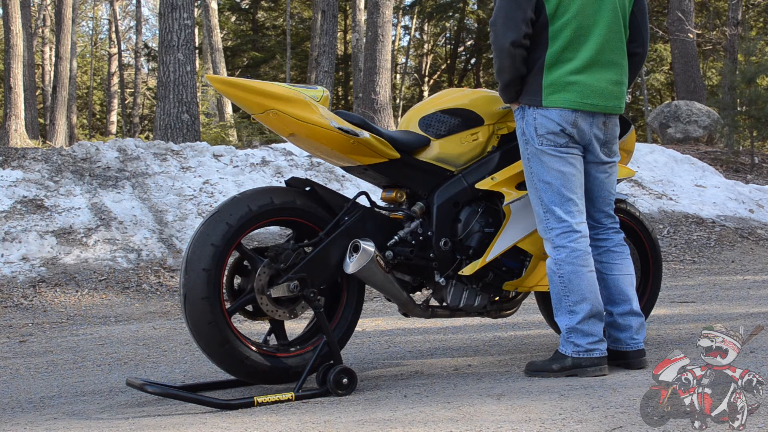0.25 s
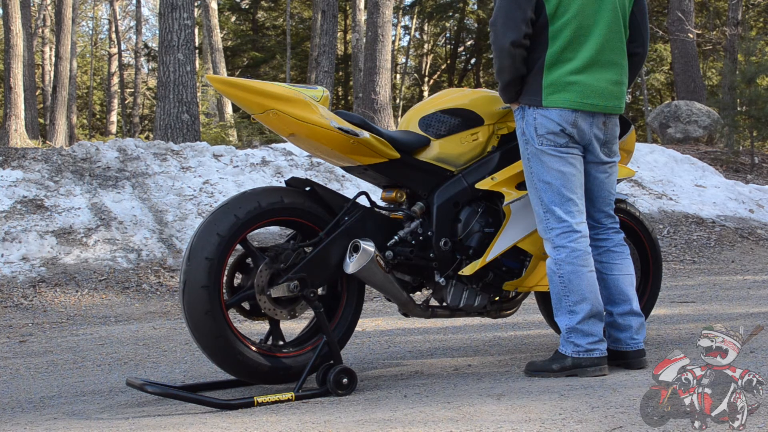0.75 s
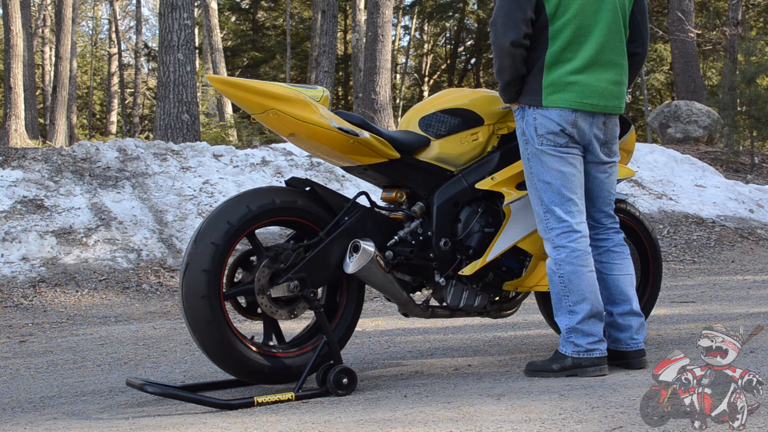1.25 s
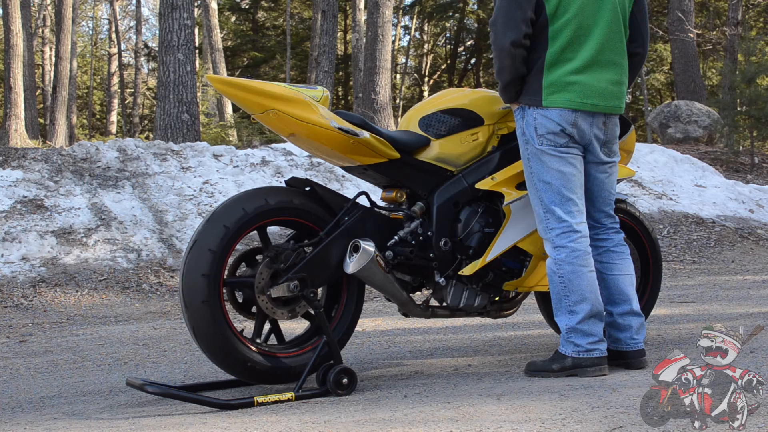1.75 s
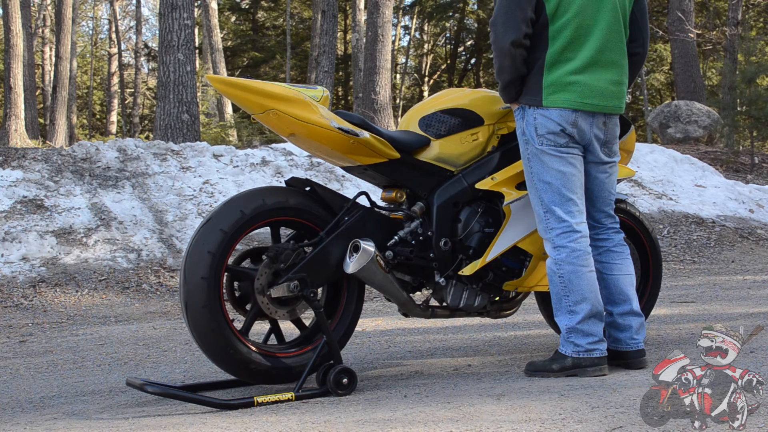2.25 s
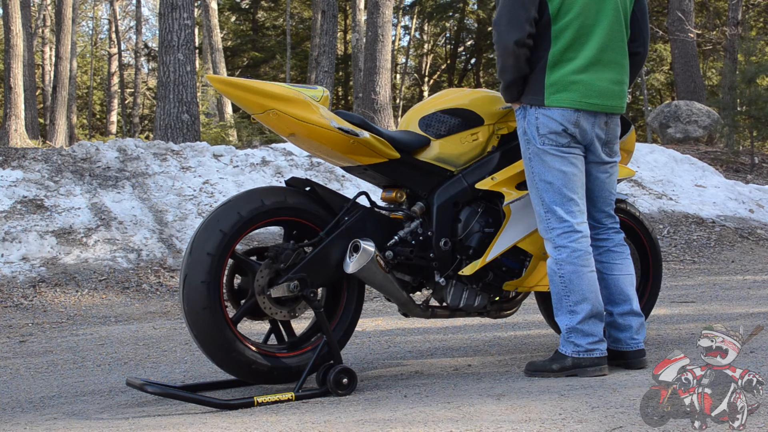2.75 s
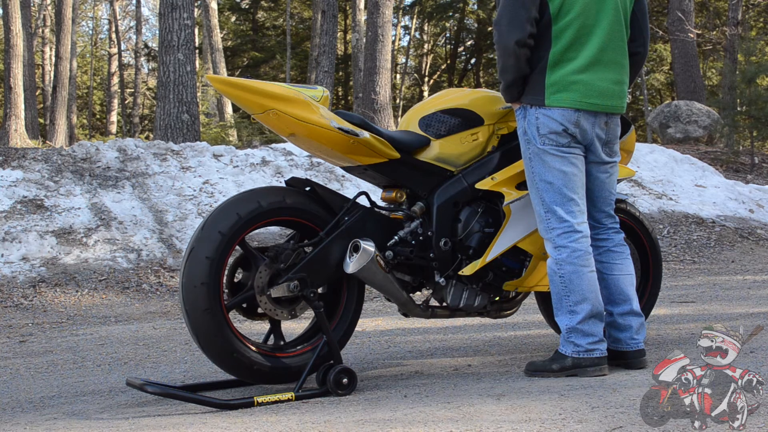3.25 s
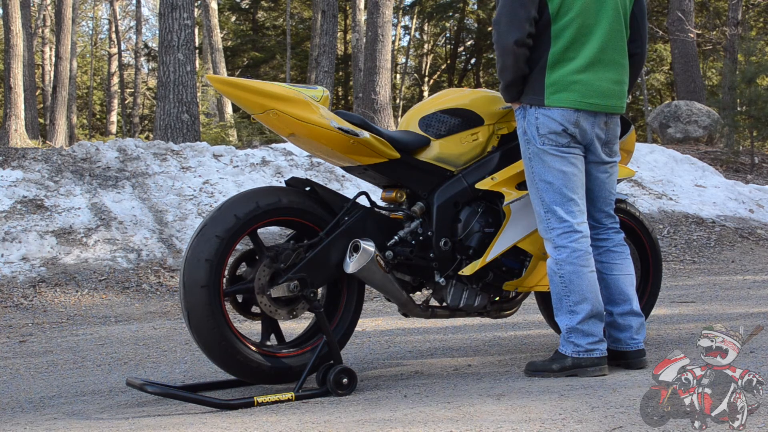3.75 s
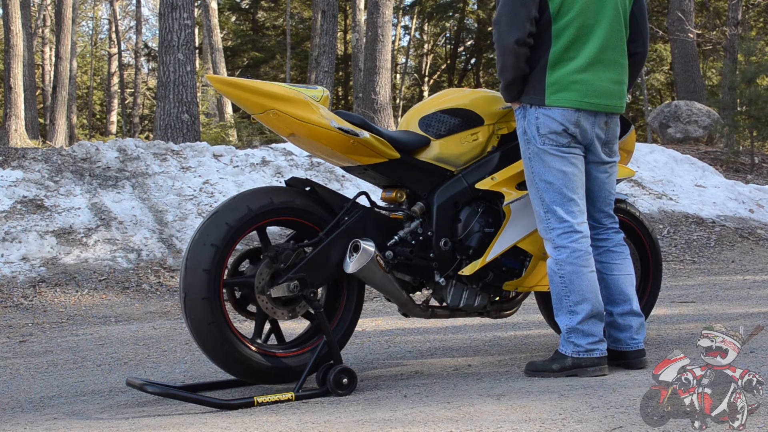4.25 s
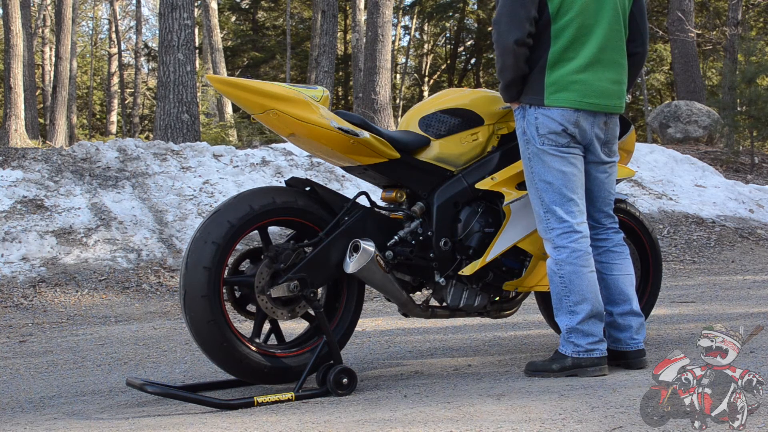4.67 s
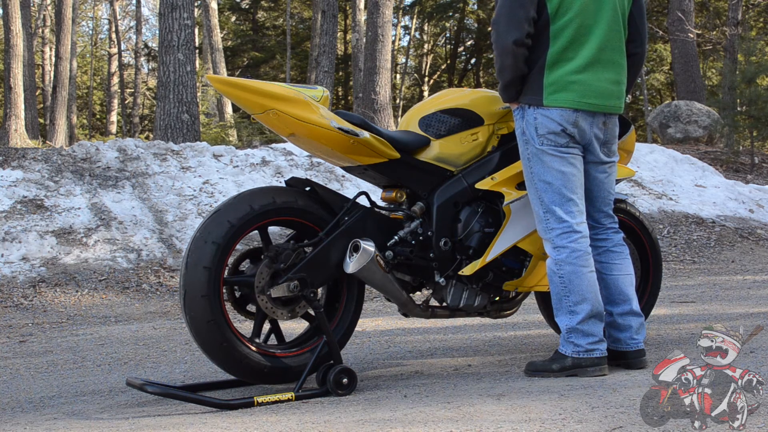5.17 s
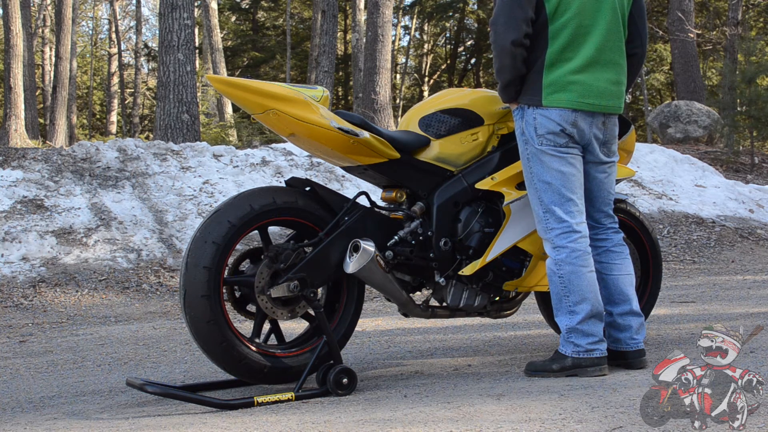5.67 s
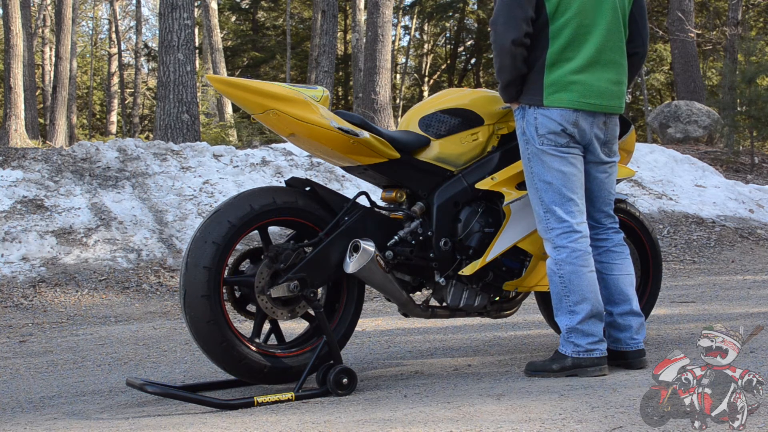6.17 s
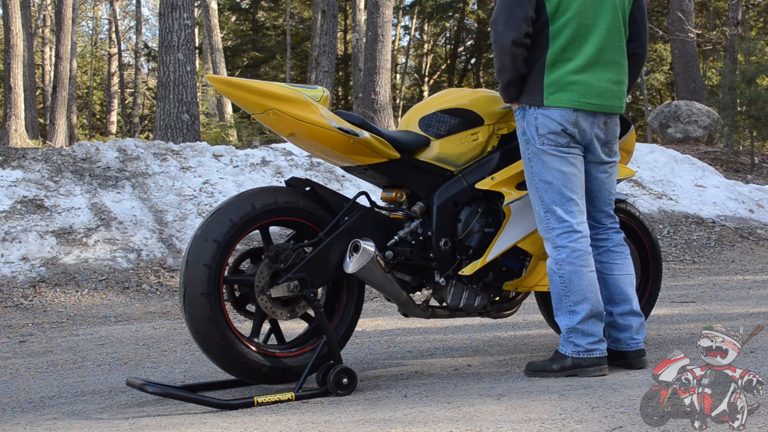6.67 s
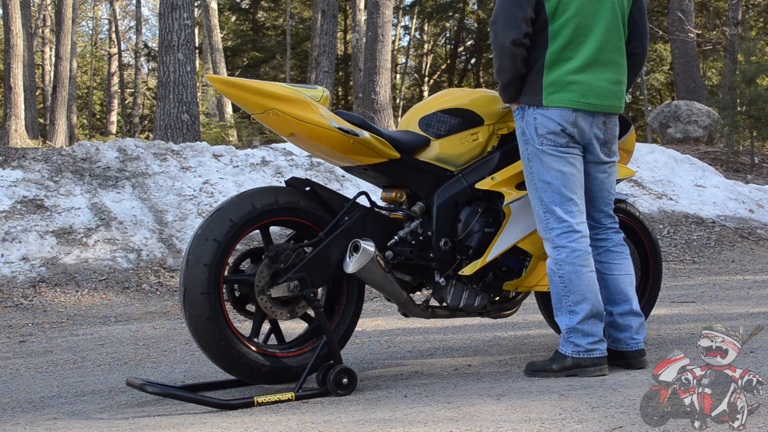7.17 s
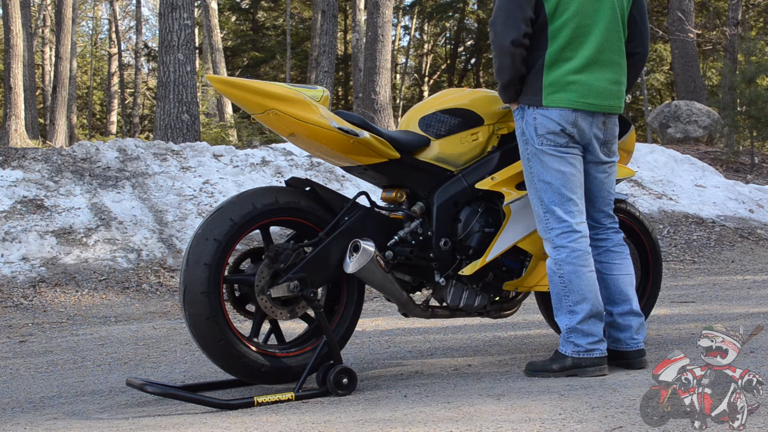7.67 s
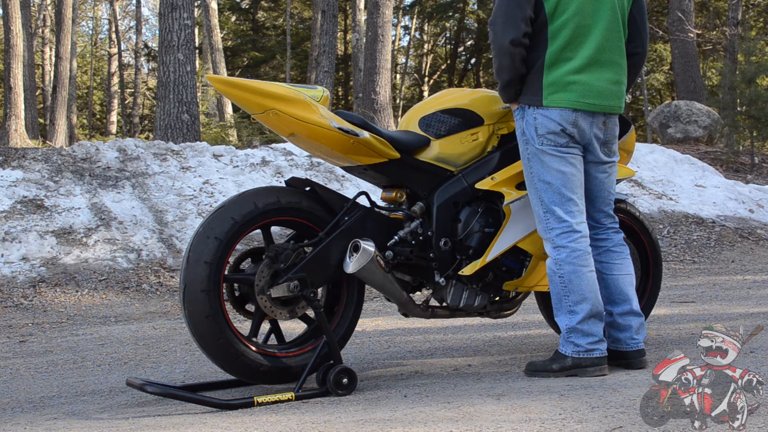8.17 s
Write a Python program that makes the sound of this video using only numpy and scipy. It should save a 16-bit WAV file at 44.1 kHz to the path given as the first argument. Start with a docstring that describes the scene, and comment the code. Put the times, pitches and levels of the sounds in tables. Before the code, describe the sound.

A stationary sport bike, heard close to its exhaust: the note climbs within about a second and a half and holds, hard and buzzing with gas hiss and fine valve ticking. It is released, pops and coasts down into a rough, low burble. Two abrupt throttle stabs follow, booming and fizzing at the peaks, each dropping back. Open air, faint woodland echo.

```python
"""A gravel road by a wood: a four-cylinder sport motorcycle stands there, held at high revs, let down
to near idle, then blipped twice. A counter of firings drives the engine: harmonic pulses boom through
the muffler and ring the tailpipe; noise surging with the firings makes gas hiss, valve clatter and fizz.
Fuel pops in the pipe, echoes scatter in the wood, and the loudest pulses overload the microphone."""
import sys
import numpy as np
from scipy import signal
from scipy.fft import irfft
from scipy.io import wavfile
from scipy.ndimage import uniform_filter1d

SR = 44100
rng = np.random.default_rng(int(sys.argv[2]) if len(sys.argv) > 2 else 0)


def log_audio(samples):
    """Write samples as a 16-bit WAV file to the path given in sys.argv[1]."""
    # one column per channel
    frames = np.atleast_2d(samples).T
    # limit to full scale, then quantise
    limited = np.clip(frames, -1, 1)
    pcm = np.round(limited * 32767).astype(np.int16)
    wavfile.write(sys.argv[1], SR, pcm)


N = 370881
TIME = np.arange(N) / SR
TAPS = 8192  # samples in a filter's spectrum and in one cycle of the pulse waveform
BINS_HZ = np.fft.rfftfreq(TAPS, 1 / SR)

# The held throttle is let go. In order: throttle shuts in seconds, friction in Hz per second,
# burbling starts in seconds.
LET_GO = (3.585, 130.3, 4.04)
# Throttle blips. Each row: engine catches in seconds, throttle shuts in seconds, lowest and top speed in
# firings per second, friction afterwards in Hz per second, burbling starts in seconds.
BLIPS = [(5.19, 6.459, 63, 276.1, 142.9, 6.71), (7.374, 7.746, 88, 285, 139, 7.96)]
# Colour of turbulent gas in the pipe. Each row: frequency in Hz, relative level in dB per Hz.
TURBULENCE = [(40, -67), (160, -14), (500, -13.5), (950, -16.5), (1400, -6), (2100, -5), (2700, -12.5),
              (3300, -25.5), (5000, -36), (15000, -75)]


def amp(db):
    """Decibels to gain."""
    return 10 ** (np.asarray(db) / 20)


def curves(rows, at):
    """Every later column of a table, read along its first column."""
    first, *columns = np.transpose(rows)
    return np.array([np.interp(at, first, column) for column in columns])


def spectrum(rows, order=1):
    """One dB column of a colour table, drawn on a log-frequency axis."""
    table = np.transpose(rows)
    return np.interp(np.log(BINS_HZ + 1), np.log(table[0]), table[order])


def bumps(rows):
    """Bell-shaped peaks and dips, in dB."""
    return sum(db * np.exp(-2 * ((BINS_HZ - hz) / width) ** 2) for hz, width, db in rows)


def colour(x, db):
    """Minimum-phase filter: the ringing comes only after each pulse."""
    log_gain = np.log(amp(np.r_[db, db[-2:0:-1]]))
    response = np.exp(np.conj(signal.hilbert(log_gain)))
    ring = np.fft.ifft(response).real
    return signal.oaconvolve(x, ring[:TAPS // 2])[:N]


def steady(x):
    """Brings the running level to one, leaving single pulses as they are."""
    power = uniform_filter1d(x ** 2, size=2000)
    power = uniform_filter1d(power, size=2000)
    return x / np.sqrt(abs(power) + 1e-14)


def wander(hz):
    """Random drift between points of unit spread, hz points a second."""
    points = rng.standard_normal(N // 20)
    return np.interp(TIME * hz, np.arange(len(points)), points)


def per_firing(firings):
    """One random number for each firing, changing between the pulses."""
    draws = rng.standard_normal(N // 20)
    return uniform_filter1d(draws[np.round(firings).astype(int)], size=24)


def ramp(start, length):
    """Rises from 0 to 1 over a length in seconds."""
    return np.clip((TIME - start) / length, 0, 1)


def dip(s, depth, length):
    """A gain that sinks briefly around one moment."""
    return 1 - depth * np.exp(-((TIME - s) / length) ** 2)


def coast(shut, top_hz, friction):
    """Constant friction and windage, growing with speed squared, slow the crank after the throttle shuts."""
    windage_hz = 248.36  # at this firing rate windage equals friction
    angle = np.arctan(top_hz / windage_hz) - friction / windage_hz * np.maximum(TIME - shut, 0)
    return windage_hz * np.tan(np.maximum(angle, 0))


def crank():
    """Speed, throttle, load and fuel cut: a held run, then each blip catches the coasting engine and spins it up."""
    # Speed while the throttle is held. Each row: time in seconds, firings per second in Hz.
    held_speed = [(0.0, 279.3), (0.3, 288.4), (0.43, 294.8), (0.75, 360), (1.06, 414), (1.24, 435),
                  (1.51, 449.4), (2.29, 452.8), (2.9, 451.0), (3.53, 462), (3.57, 459.6)]
    catch_s, shut_s = .024, .021  # time for the fuel to come back, and to run out
    burble_rise_s = .044
    # In a blip the load swells first and the speed follows in an S.
    blip_s, run_up_skew, load_skew = .355, 2.37, 1.06

    shut, friction, burble = LET_GO
    held, = curves(held_speed, TIME)
    hz = np.where(TIME < shut, held, coast(shut, held[-1], friction))
    throttle = 1 - ramp(shut, shut_s)
    load = np.zeros(N)
    cut = ramp(shut, shut_s) - ramp(burble, burble_rise_s)
    for catch, next_shut, from_hz, top_hz, friction, burble in BLIPS:
        progress = ramp(next_shut - blip_s, blip_s)
        run_up = from_hz + (top_hz - from_hz) * np.sin(np.pi / 2 * progress ** run_up_skew)
        hz = np.where(TIME < shut, hz, np.maximum(hz, run_up))
        shut = next_shut
        hz = np.where(TIME < shut, hz, coast(shut, top_hz, friction))
        throttle = throttle + ramp(catch - catch_s / 2, catch_s) - ramp(shut, shut_s)
        cut = cut + ramp(shut, shut_s) - ramp(burble, burble_rise_s)
        load = load + np.sin(np.pi * progress ** load_skew)
    return hz, throttle, load, cut


def burn(firings, hz, load):
    """Strength of the burn: it flutters, chokes at shut throttles and misfires, and has lazy firings near idle."""
    # Weak burns that briefly choke the held note. Each row: time in seconds, depth from 0 to 1.
    misfires = [(1.885, 0.14), (2.165, 0.17), (2.198, 0.05)]
    misfire_s = .014
    shut_depth, shut_dip_s = .27, .0098  # the note chokes as the throttle snaps shut
    lazy_below_hz, lazy_rarity, lazy_depth = 115, 1.25, .5  # rarity in standard deviations
    flutter_db = 1

    shuts = [LET_GO[0]] + [blip[1] for blip in BLIPS]
    chokes = [dip(s, shut_depth, shut_dip_s) for s in shuts]
    chokes += [dip(s, depth, misfire_s) for s, depth in misfires]
    is_lazy = (per_firing(firings) > lazy_rarity) * (hz < lazy_below_hz)
    lazy = uniform_filter1d((1 - load) ** 2 * is_lazy, size=60)
    flutter = amp(flutter_db * wander(hz=24.07))
    return np.prod(chokes, axis=0) * (1 - lazy_depth * lazy) * flutter


def pulses(firings, blunt, steep, sweep, order):
    """One pulse a firing, and the imbalance of the four cylinders; harmonics above blunt fall away."""
    # Unequal cylinders put lines between the firing harmonics. Each row: multiple of the firing rate,
    # level in dB on throttle, level in dB coasting.
    half_orders = [(.5, -10, -20), (1.5, -20, -9), (2.5, -5, -2), (3.5, -16, -1), (4.5, -2, -1),
                   (5.5, -5, -3), (6.5, -7, -3), (10.5, -4, -4)]
    k = np.arange(161) / 4  # one cycle of the waveform is four firings
    table = np.transpose(half_orders)
    line_db = np.where(k % .5 == 0, np.interp(k, table[0], table[order]), -24)
    imbalance = (k % 1 > 0) * amp(line_db)
    smear = np.exp(-1j * sweep * k ** 2)  # spreads the pulse in time
    shape = smear / (1 + (k / blunt) ** steep) * (k > 0)
    place = firings / 4 % 1 * TAPS
    # Unequal headers deliver their pulses a little early or late: a quarter-cycle phase shift.
    parts = (k % 1 == 0, 1j * imbalance)
    return [np.interp(place, np.arange(TAPS), irfft(shape * part, TAPS)) for part in parts]


def puffs(firings, between, length, lag):
    """Noise that surges with each firing and decays towards a floor; length and lag are in firings."""
    surge = np.exp(-((firings - lag) % 1) / length)
    return rng.standard_normal(N) * (between + surge)


def thin(x, speed):
    """At speed the muffler stays full of gas, and its slow heaving evens out."""
    low_pass = signal.butter(1, 260, fs=SR, output="sos")
    slow = signal.sosfilt(low_pass, x)
    return x - np.minimum(5.6 * speed ** 2.56, 1) * slow


def boom(firings, speed, throttle, uneven, spread):
    """On throttle each firing pushes a pulse out of the muffler; coasting, each cylinder sucks one in."""
    # Muffler colour. Each row: frequency in Hz, relative dB on throttle, relative dB coasting.
    muffler = [(20, -71, -18), (63, -11, -7.5), (151, 0.5, 9.5), (188.8, -2, 4), (306, -1.5, 4.5),
               (397, 6, 6.5), (530, 0.5, -0.5), (740, -2, -3.5), (910, -4, -7.5), (1190, -18, -2),
               (2040, -69, -51), (6000, -77, -96)]
    strength = 1 + uneven * per_firing(firings)
    push, push_imbalance = pulses(firings, blunt=4.06, steep=4.81, sweep=0, order=1)
    suck, suck_imbalance = pulses(firings, blunt=1.74, steep=1.98, sweep=0, order=2)
    # The cylinders differ more at speed.
    push = steady(push + spread * speed ** .3 * push_imbalance) * strength
    suck = steady(suck + speed ** .53 * suck_imbalance) * strength
    gas = uneven * puffs(firings, between=.9, length=1.0, lag=0)
    driven = steady(colour(push + amp(8.5) * gas, spectrum(muffler, order=1)))
    coasting = steady(colour(amp(21) * gas - suck, spectrum(muffler, order=2)))
    blend = throttle * driven + (1 - throttle) * coasting
    return steady(thin(blend, speed))


def rasp(firings, throttle, uneven, turbulent):
    """The steep front of each pulse rings the tailpipe, and so does the turbulent gas behind it."""
    # Tailpipe colour. Each row: frequency in Hz, relative dB on throttle, relative dB coasting.
    tailpipe = [(300, -55, -55), (750, -24, -19), (1150, -12, -6), (1400, -5, -4), (2100, -4, -4),
                (2500, -13, -5), (3200, -21, -8), (4000, -19, -10), (5500, -29, -25), (9000, -36, -38),
                (15000, -54, -54)]
    # Standing waves in the tailpipe. Each row: frequency in Hz, width in Hz, height in dB for the note.
    pipe_modes = [(1026, 19, -24), (1298, 120, 8), (1526, 127, 11.5), (1712, 54, -21), (2062, 166, 6.5),
                  (2810, 210, 6.5), (3720, 220, 6)]
    # The headers colour the imbalance on throttle. Each row: frequency in Hz, width in Hz, height in dB.
    headers = [(1406, 190, -11.5), (2170, 90, 0.5)]
    strength = 1 + .7 * uneven * per_firing(firings)
    fronts = firings + .015 * uneven * wander(hz=90)  # slight jitter in timing
    modes_db = bumps(pipe_modes)

    even, imbalance = pulses(fronts, blunt=59, steep=2.5, sweep=.7, order=1)
    driven = strength * (even + colour(imbalance, bumps(headers)))
    driven = colour(driven, spectrum(tailpipe, order=1) + modes_db)
    coasting = strength * sum(pulses(fronts, blunt=30, steep=2, sweep=0, order=2))
    coasting = colour(coasting, spectrum(tailpipe, order=2) + modes_db)
    note = steady(throttle * steady(driven) - (1 - throttle) * steady(coasting))

    gas_db = per_firing(firings) + 2.2 * turbulent * wander(hz=30)
    gas = puffs(firings, between=.8, length=.3, lag=0) * amp(gas_db)
    roar = steady(colour(gas, spectrum(TURBULENCE) + .072 * modes_db))  # the modes barely mark the roar
    return np.sqrt(1 - turbulent) * note + np.sqrt(turbulent) * roar


def hiss(firings, turbulent):
    """The gas jet at the mouth of the pipe; it fades when the flow is smooth."""
    # Jet colour. Each row: frequency in Hz, relative level in dB per Hz.
    jet_colour = [(1000, -43.5), (2500, 1), (3800, -2), (5000, -5.5), (6500, -9), (8500, -9.5),
                  (11000, -25), (15000, -39.5)]
    jet_db = 1.2 * per_firing(firings) + .7 * wander(hz=25)
    jet = puffs(firings, between=.6, length=.35, lag=0) * amp(jet_db)
    return steady(colour(jet, spectrum(jet_colour))) * np.sqrt(np.minimum(3 * turbulent, 1))


def valves(firings, hz):
    """One bright tick a firing, a hair louder with speed, over the whirr of the gears."""
    # Valve gear colour. Each row: frequency in Hz, relative level in dB per Hz.
    tick_colour = [(500, -22), (2500, -20.5), (4500, -14.5), (7600, -8), (9000, -15), (11000, -30.5),
                   (15000, -38)]
    ticks = puffs(firings, between=.15, length=.16, lag=-.08) * amp(2.4 * per_firing(firings))
    level_db = -35 + .043 * np.log2(hz / hz.min())
    return amp(level_db) * steady(colour(ticks, spectrum(tick_colour)))


def fizz(firings, load):
    """Bright fizz on each firing: the overloaded microphone in the blips, a fine sizzle early in the long coast."""
    # The sizzle early in the long coast. In order: start in seconds, end in seconds.
    start, end = (3.588, 4.043)
    full_load_db, sizzle_db = -29.5, -33.5
    sizzling = (TIME > start) & (TIME < end)
    level = amp(full_load_db) * load ** 3 + amp(sizzle_db) * sizzling
    bursts = puffs(firings, between=.096, length=.16, lag=0)
    bursts = colour(bursts, spectrum([(2000, -30), (7000, 9), (15000, -8)]))  # Hz, relative dB
    return uniform_filter1d(level, size=600) * steady(bursts)


def pops():
    """Unburnt fuel pops: a short noise crack in the pipe with a decaying sine thud from the muffler."""
    # Each row: time in seconds, crack level in dB ahead of the pipe colour, thud level in dB.
    fuel_pops = [(3.584, -16, -17), (4.042, 6, -14)]
    cracks, thuds = np.zeros((2, N))
    for s, crack_db, thud_db in fuel_pops:
        age = np.maximum(TIME - s, 0)
        cracks += amp(crack_db) * (age > 0) * np.exp(-age / .0036)
        thuds += amp(thud_db) * np.exp(-age / .008) * np.sin(2 * np.pi * 330 * age)
    return thuds + colour(cracks * rng.standard_normal(N), spectrum(TURBULENCE) + 10)


def woods(x, wet_db, t60):
    """Faint scattered echoes from the trunks and the snow bank, falling 60 dB in t60 seconds."""
    t = TIME[:SR]
    is_echo = (rng.random(SR) < 1500 / SR) * (t > .008)  # about 1500 echoes a second, after 8 ms
    taps = rng.standard_normal(SR) * is_echo * amp(-60 * t / t60)
    return x + amp(wet_db) * signal.oaconvolve(x, taps / np.linalg.norm(taps))[:N]


def scene():
    """One crankshaft drives the engine layers; loudness and roughness follow speed, throttle and load."""
    # Loudness when firing, ahead of load. Each row: firings per second in Hz, muffler boom in dB,
    # pipe rasp in dB, gas hiss in dB.
    firing_levels = [(63, -17, -28.3, -31.5), (89, -14, -25, -28.5), (141.06, -13.5, -21.5, -23),
                     (205, -13.5, -13, -29), (285, -18.5, -12.3, -27.5), (370.6, -16, -12.5, -22.5),
                     (426, -15, -11.2, -19.5), (447.8, -17.5, -10, -19)]
    # The same columns when coasting; the muffler resonates near 140 Hz.
    coasting_levels = [(70, -20.5, -29, -33), (100.7, -17.5, -26.5, -27.5), (135, -11, -24, -25),
                       (205.14, -13.5, -19.5, -24), (265, -14, -17.5, -23.5), (340.2, -17, -14, -22.5),
                       (423, -15, -12, -11)]
    # What full load adds. In order: boom in dB, rasp in dB, hiss in dB.
    load_db = (7.5, 3.5, 2)
    # Roughness when firing. Each row: firings per second in Hz, unevenness of firings from 0 to 1 ahead
    # of load, turbulent share of the rasp from 0 to 1.
    firing_roughness = [(63, .19, .95), (130, .1, .58), (250, .09, .38), (285, .27, .25), (350, .14, .15),
                        (460, .14, .17)]
    # The same columns coasting with the fuel cut off, when the note is clean.
    cut_roughness = [(200, .05, .24), (280, .03, .12), (335, .03, .08), (460, .02, .03)]
    # The same columns later in the coast, when it burbles.
    burble_roughness = [(100, .22, .92), (180, .19, .7), (270, .13, .48)]

    hz, throttle, load, cut = crank()
    levels = throttle * curves(firing_levels, hz) + (1 - throttle) * curves(coasting_levels, hz)
    boom_db, rasp_db, hiss_db = levels + np.outer(load_db, load)
    roughness = throttle * curves(firing_roughness, hz) + cut * curves(cut_roughness, hz)
    roughness += (1 - throttle - cut) * curves(burble_roughness, hz)
    uneven, turbulent = roughness
    spread = 1 - .55 * load  # under load the cylinders fire more alike
    uneven = spread * uneven
    firings = np.cumsum(hz + 1.103 * wander(hz=14)) / SR  # the crank never turns quite evenly

    exhaust = amp(boom_db) * boom(firings, hz / hz.max(), throttle, uneven, spread)
    exhaust += amp(rasp_db) * rasp(firings, throttle, uneven, turbulent)
    bike = burn(firings, hz, load) * exhaust
    bike += amp(hiss_db) * hiss(firings, turbulent)
    bike += valves(firings, hz) + fizz(firings, load) + pops()
    return woods(bike, wet_db=-18, t60=.5)[None]


def record(dry):
    """The microphone: narrow dips, overload with a rounded knee, then a band limit."""
    # Dips in the response. Each row: frequency in Hz, width in Hz, depth in dB.
    mic_dips = [(5676, 284, -13.5), (6940, 48, -58)]
    knee, edge_hz = .68, 15750  # knee as a share of full scale
    x = colour(dry[0], bumps(mic_dips))
    below = np.clip(x, -knee, knee)
    clipped = below + (1 - knee) * np.tanh((x - below) / (1 - knee))
    low_pass = signal.firwin(511, edge_hz, window=("kaiser", 9), fs=SR)
    return signal.oaconvolve(clipped, low_pass, "same")[None]


dry = scene()
out = record(dry)
log_audio(out)
```